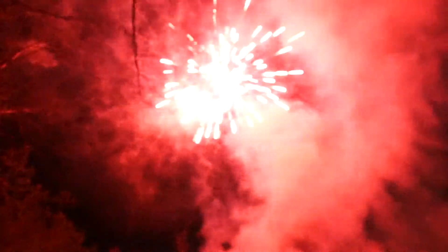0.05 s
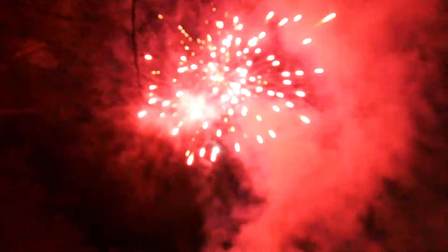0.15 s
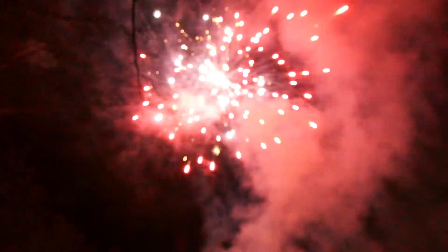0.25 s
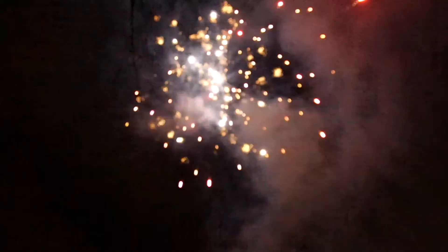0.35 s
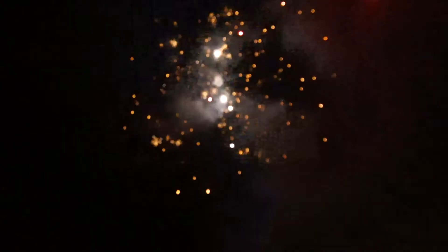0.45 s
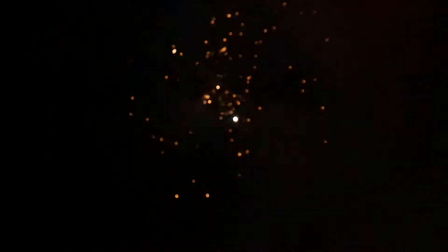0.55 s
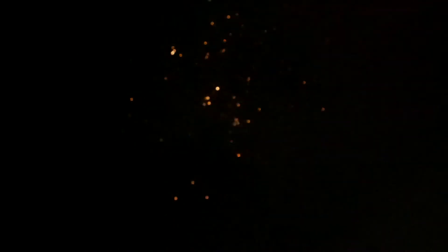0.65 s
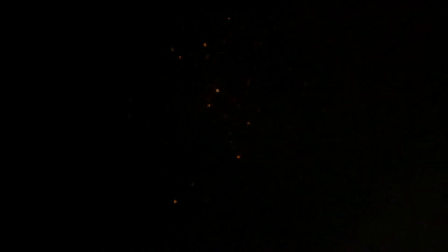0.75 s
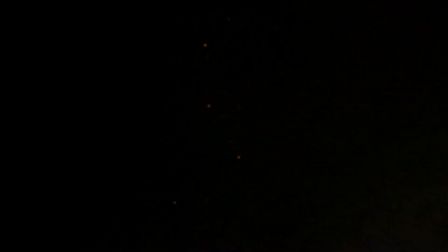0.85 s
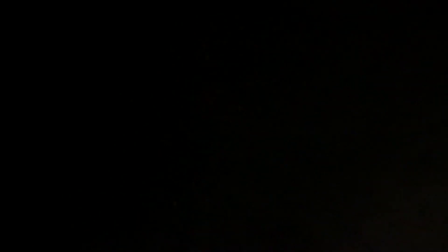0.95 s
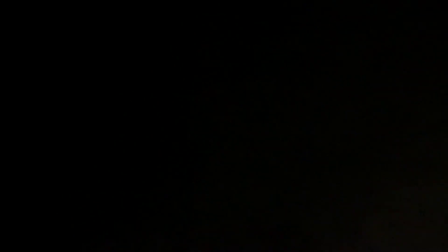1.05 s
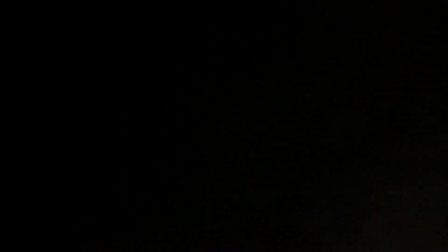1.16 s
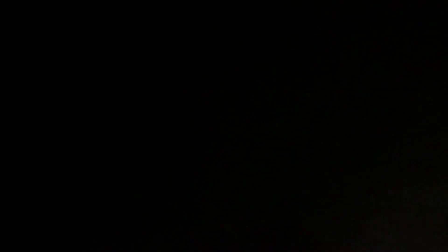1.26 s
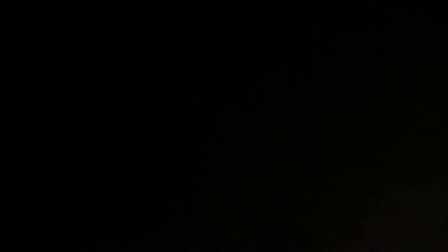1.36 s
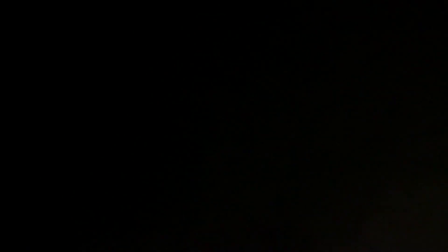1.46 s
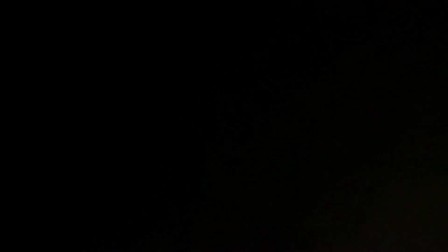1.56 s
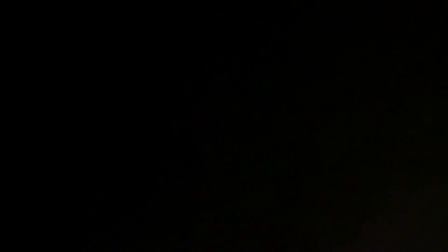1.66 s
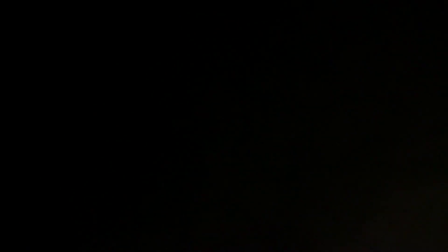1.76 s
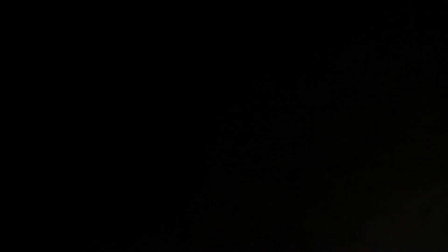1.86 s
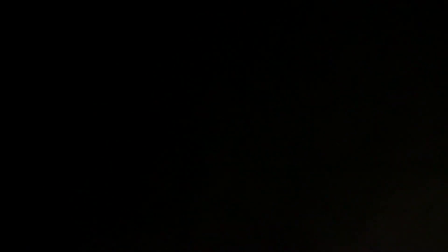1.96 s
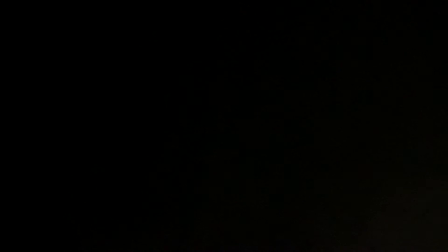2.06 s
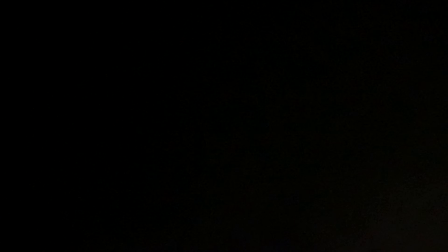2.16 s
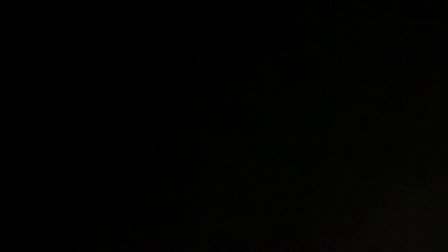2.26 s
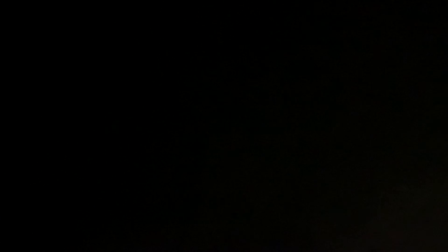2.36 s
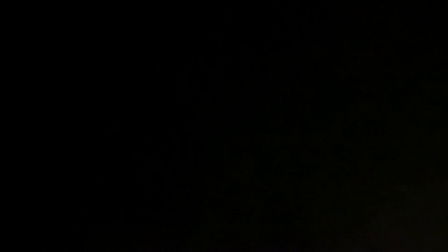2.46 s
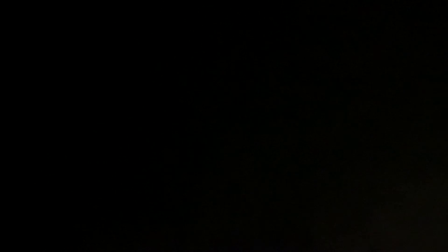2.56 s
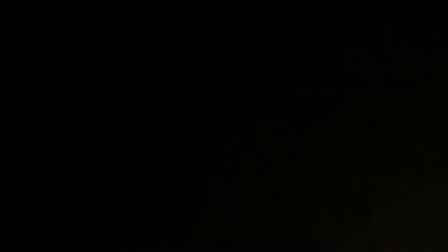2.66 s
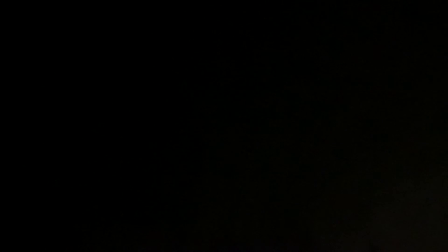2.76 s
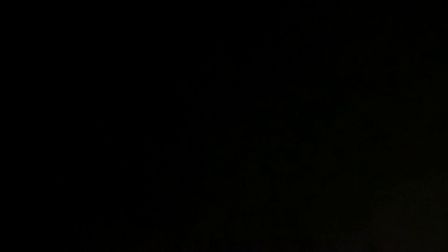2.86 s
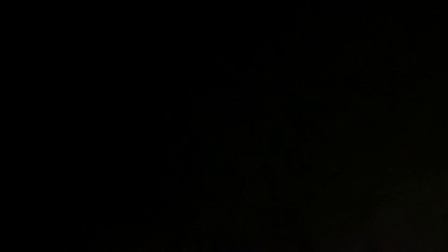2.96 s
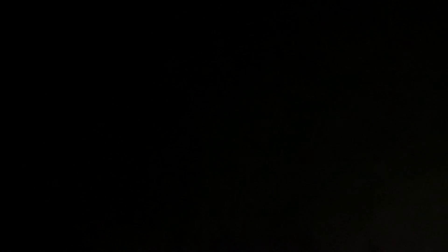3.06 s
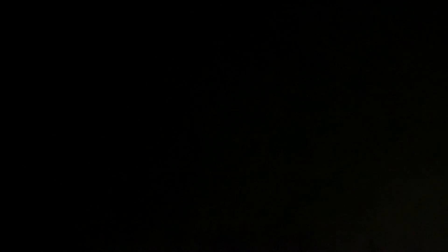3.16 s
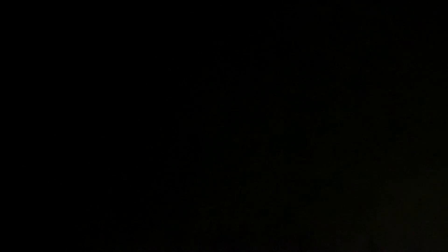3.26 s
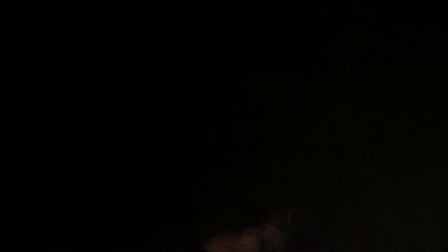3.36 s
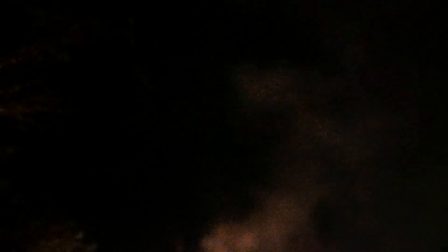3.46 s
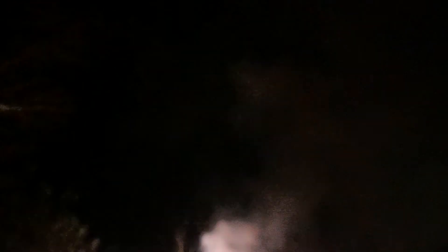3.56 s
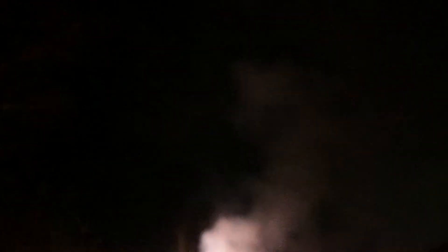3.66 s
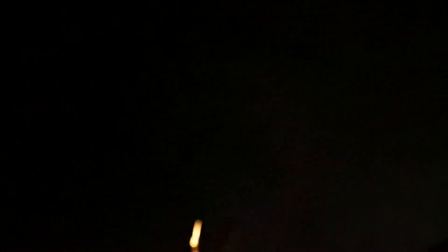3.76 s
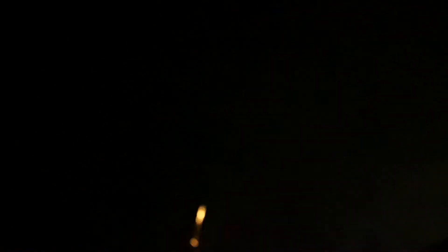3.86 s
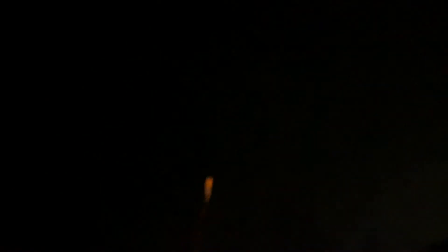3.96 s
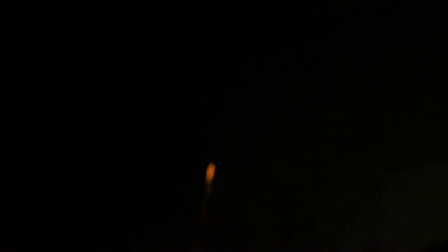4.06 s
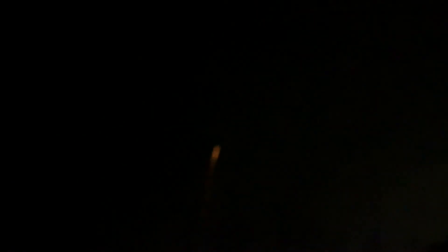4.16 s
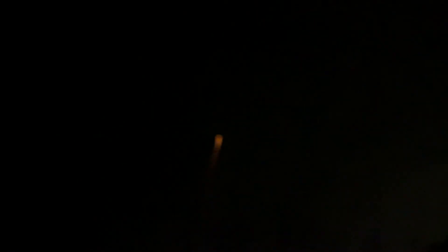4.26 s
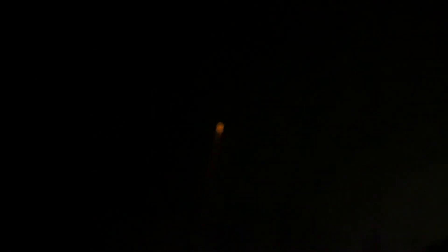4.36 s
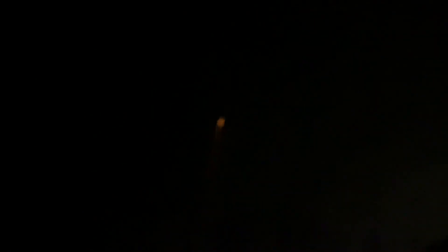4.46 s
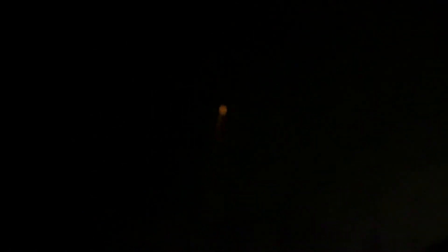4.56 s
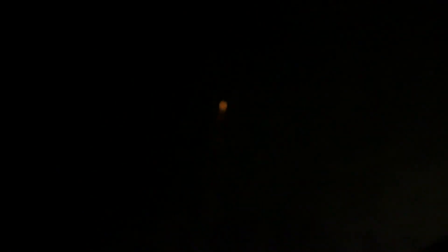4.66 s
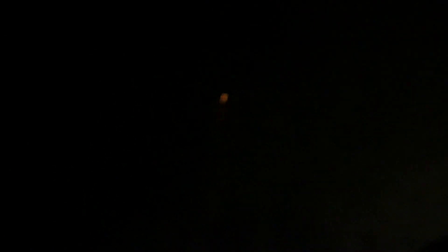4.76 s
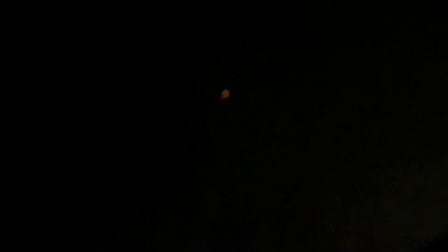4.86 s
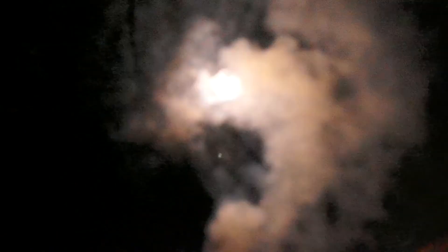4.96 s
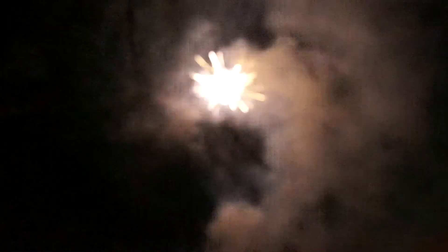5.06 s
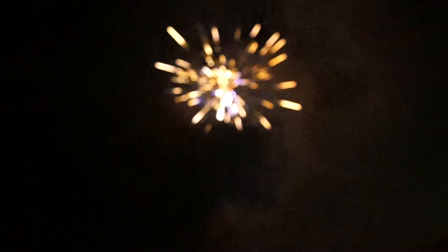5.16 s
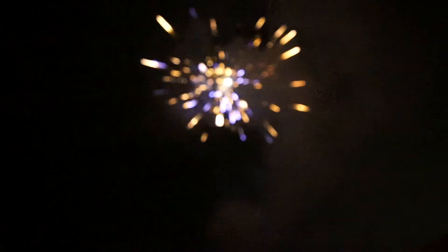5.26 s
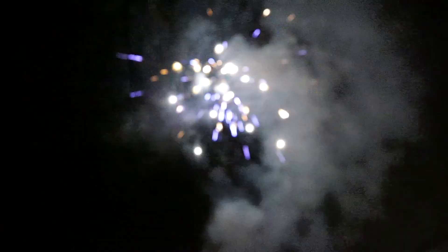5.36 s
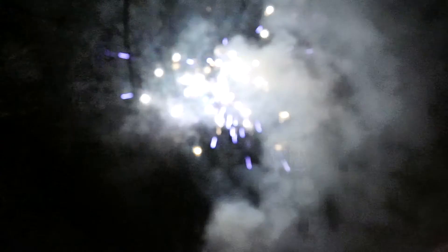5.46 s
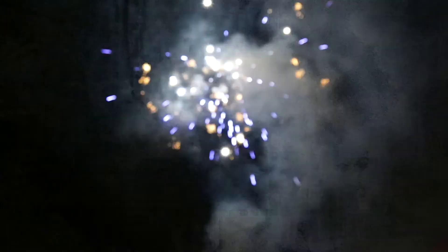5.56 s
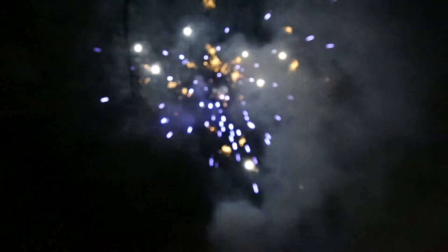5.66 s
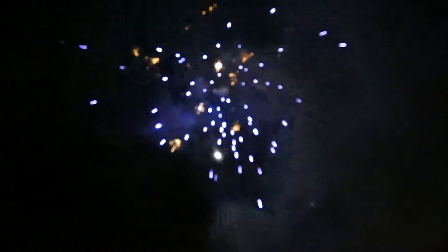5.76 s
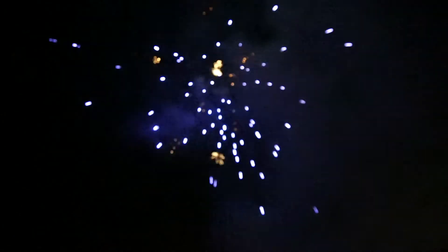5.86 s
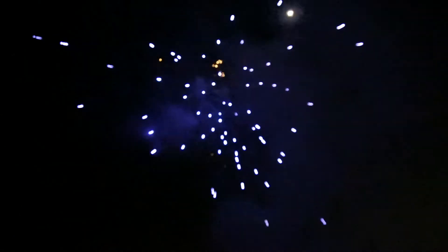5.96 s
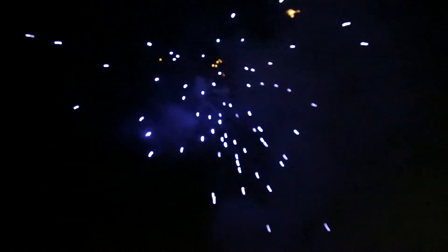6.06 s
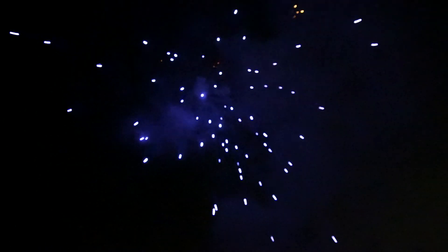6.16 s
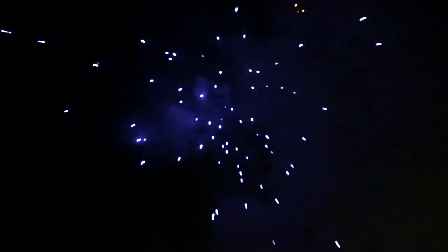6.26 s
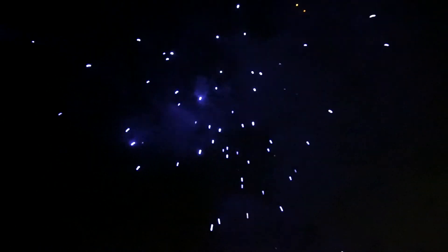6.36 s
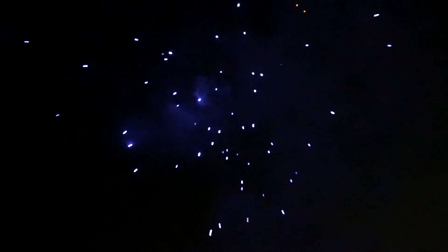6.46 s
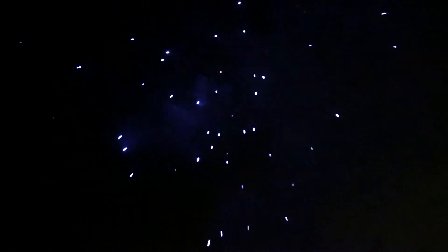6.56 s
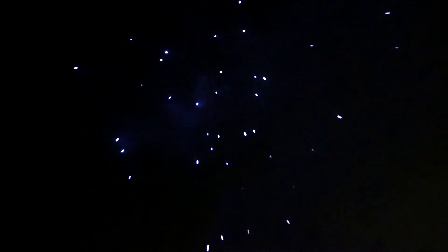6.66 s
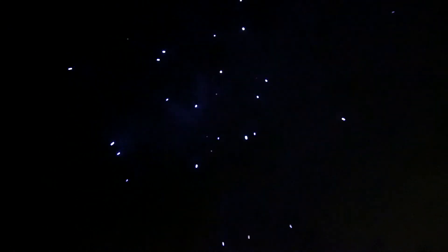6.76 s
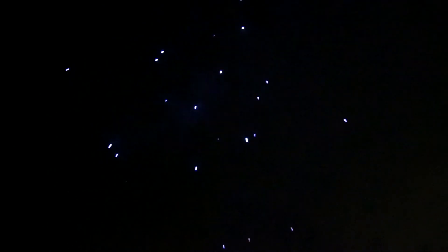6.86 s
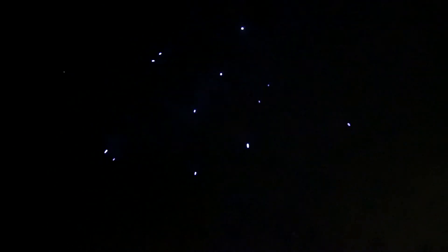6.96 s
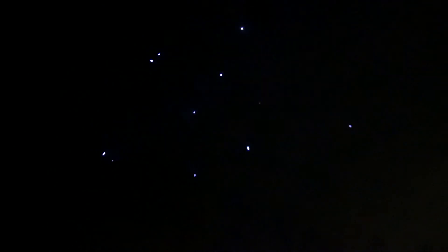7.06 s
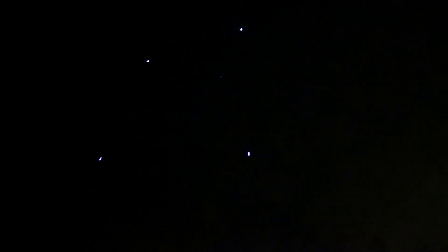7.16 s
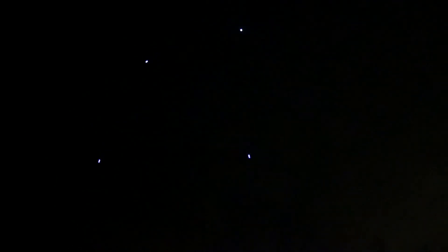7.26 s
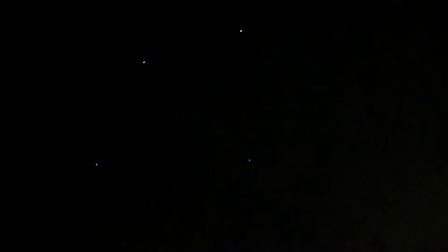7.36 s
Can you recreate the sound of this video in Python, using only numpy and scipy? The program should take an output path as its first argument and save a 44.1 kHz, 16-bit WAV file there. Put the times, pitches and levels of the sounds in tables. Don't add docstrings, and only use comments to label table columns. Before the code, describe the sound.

Outdoors at night near trees, a firework burst is already roaring, then its stars snap in a dense crackle and the echo rolls away. Faint cloth rustles and clicks sit close to the microphone. A fuse hisses briefly, a launch charge bangs and echoes, then a second shell blasts and crackles before fading into quiet handling noise. A small camera's stereo sound compresses the loudest peaks.

```python
import sys
import numpy as np
from scipy import signal
from scipy.io import wavfile

SR = 44100
rng = np.random.default_rng(int(sys.argv[2]) if len(sys.argv) > 2 else 0)


def volts_from_decibels(level):
    exponent = np.asarray(level, float) / 20
    return 10 ** exponent


def transcribe(u):
    v = np.clip(np.atleast_2d(u).T, -1, 1)
    q = np.round(v * 32767).astype(np.int16)
    wavfile.write(sys.argv[1], SR, q)


N = 326781
FRAME, HOP = 1024, 512

# f/Hz, side-mid/dB
PORT_WIDTH = [(60, -7.5), (110, -7), (190, -21), (340, -19), (610, -10.5), (1100, -5.5), (1960, -3.5),
              (3510, -3), (6280, 0), (11200, 2.5)]
# f/Hz, L-R/dB
PORT_LEAN = [(60, -4), (110, -0.5), (190, -1), (340, 0.0), (610, 0.5), (1100, 0.5), (1960, 1.5),
             (3510, 1.0), (6280, 2), (11200, 1)]
# t/s, dip/dB
DUCKS = [
    (0.51, -4),
    (.63, -1),
    (.736, -0.5),
    (5.403, -4),
    (5.699, -2.5),
    (5.865, 0.5),
    (5.975, -0.5),
]

# from/s, to/s, start level >5 kHz/dB, end level/dB
RUSTLE = [
    (1.104, 2.3, -82.5, -75.5),
    (2.44, 2.7, -67.5, -75),
    (2.784, 2.95, -67, -68),
    (3.72, 4.424, -61, -61.5),
    (4.546, 4.874, -60, -58),
    (6.221, 6.447, -75, -73.5),
    (6.56, 7.247, -72, -79.5),
]
# f/Hz, density/dB per Hz
RUSTLE_TONE = [(1000, -25), (2500, 4.5), (5000, -0.5), (8000, -4), (11500, -10.5)]
# t/s, level/dB, f/Hz, t60/s, L-R/dB
TICKS = [(1.3, -50, 5200, .015, 1), (2.44, -53, 5300, .03, 0), (4.288, -44, 9800, 0.012, 1),
         (4.518, -26, 1970, 0.014, 4), (4.517, -30, 3300, 0.015, 0), (4.79, -39, 5070, 0.099, -12),
         (4.789, -40, 2720, 0.044, -1), (4.789, -40, 10400, 0.026, -2.5), (4.872, -32.5, 3590, 0.073, -15),
         (4.872, -40, 7350, 0.079, -7), (4.944, -36.5, 8550, .041, -3), (2.76, -58.5, 9100, .05, 1)]
# t/s, level/dB, f/Hz, t60/s, L-R/dB
SCRAPES = [(1.473, -30, 2900, .007, 2), (6.895, -52, 6000, .015, 2), (1.774, -55, 5830, 0.025, 6),
           (2.004, -45, 4830, 0.092, 7), (2.14, -54, 4073, 0.014, 0), (2.245, -34, 700, 0.017, 2),
           (2.372, -53, 6000, .02, 2), (2.385, -44, 2800, 0.017, 17), (2.427, -50, 6500, .14, -5),
           (2.66, -54, 3900, 0.014, 2), (3.009, -38, 7000, .016, 1.5), (3.333, -28, 7500, .008, 1),
           (4.05, -42, 7000, 0.035, 0), (4.155, -41, 7000, 0.059, -3), (4.414, -41, 5940, 0.062, 2.5),
           (4.546, -35, 8300, 0.017, 14), (4.632, -41, 7000, .015, 15), (4.646, -40, 6000, 0.11, 18),
           (6.124, -35, 6570, 0.075, -3), (6.14, -42, 8000, 0.023, 0), (6.557, -55, 7000, 0.21, -17),
           (3.91, -38, 7000, .025, 0), (7.02, -52, 4500, 0.025, 0.5), (7.36, -46, 4200, 0.017, -7)]

# from/s, to/s, start level 1-2.5 kHz/dB
FUSE = [
    (3.018, 3.447, -41),
    (4.939, 5.1, -39),
    (7.334, 7.41, -45),
]
# f/Hz, density/dB per Hz
FUSE_TONE = [(530, -31), (900, -11), (1090, -8.5), (1600, -2.5), (2320, -7.5), (8260, -31), (11000, -29),
             (11500, -60), (15000, -82), (22000, -120)]
# f/Hz, width/Hz, level/dB
FUSE_TUBE = [(1695, 230, 2), (2090, 160, -2), (3420, 1160, -15), (4200, 590, -20.5), (7000, 2900, -24)]

# f/Hz, density/dB per Hz
YOUNG_ECHO_TONE = [(35, -86), (60, -44), (184, -22), (256, -10), (312, -7), (416, -3.5), (674, -5),
                   (1740, -7), (1850, -8.5), (3510, -11.5), (9230, -24), (10800, -25), (11500, -57),
                   (15000, -85), (22000, -120)]
# f/Hz, loss/dB per s of flight
AIR_LOSS = [(60, 8.5), (200, -2), (500, 0.5), (1000, 1.5), (2000, 5), (3000, 8.5), (4500, 17), (7000, 28.5),
            (11500, 62)]
# f/Hz, width/Hz, gain/dB
GROUND = [(390, 70, 2.5), (582, 187, 0), (827, 164, 4.5), (1440, 120, 2)]
# low f/Hz, high f/Hz
ECHO_BAND_HZ = (300, 1200)
# from/s, to/s
LAUNCH_SPAN_S = (3.44, 5.09)
# t/s, level/dB, source length/s, first fall/dB per s, flight gained/s per s
CARPETS = [
    (-.1, -19.5, 0.43, 107, 2.7),
    (0.446, -28, 0.25, 13.5, 2.12),
    (3.448, -25.5, 0.015, 299, .5),
    (3.475, -20.5, 0.085, 29, 1.58),
    (5.094, -26, 0.097, 289, .5),
    (5.14, -19.5, .33, 112, 3.3),
    (5.63, -30.5, 0.3, 13.5, 1.98),
]

# t/s, level >3 kHz/dB, hold/s, fall/dB per s
SWARM = [
    (.34, -17.5, 0.21, 95),
    (0.454, -16.5, .05, 85.5),
    (5.465, -17.5, 0.24, 56),
]
# from/s, to/s, rate/stars per s
THICK = [
    (.36, .51, 60),
    (5.5, 5.7, 130),
]
# t/s, peak/dB, L-R/dB
STAR_POPS = [(.3812, -8.8, 0), (.3966, -7.6, 0), (.4033, -6.9, 2), (.4315, -7.6, 1), (.4444, -9.7, -2),
             (.4767, -8.2, -1), (.4845, -7.9, 1), (.4991, -8.7, 0), (.511, -8.6, 3), (.5359, -10.8, 3),
             (.5628, -11.7, 4), (.5657, -11.9, 3), (.5895, -12.1, 4), (.611, -5.4, 1), (.6168, -9.2, 0),
             (.6206, -14.2, 5), (.6282, -11.8, 1), (.6547, -17.5, -2), (.7253, -6.1, 2), (.7354, -14.3, 8),
             (5.4028, -9.9, 4), (5.4732, -11.1, -1), (5.4874, -6.8, 0), (5.4935, -8.4, 1),
             (5.5113, -7.2, 1), (5.5762, -7.6, 1), (5.5994, -8, 2), (5.617, -7.3, 3), (5.6436, -7.4, -1),
             (5.6652, -7.3, 2), (5.7234, -12.3, 1), (5.7346, -9.2, 1), (5.7442, -9.6, -3),
             (5.7477, -9.7, -2), (5.7553, -10.7, 2), (5.7741, -8.3, 5), (5.7784, -5.6, 0),
             (5.7885, -9.3, 0), (5.8007, -13.1, 6), (5.8098, -12.7, 8), (5.8239, -13, 4), (5.8488, -9.5, 1),
             (5.8562, -12, 2), (5.8621, -10.2, 2), (5.9075, -17.4, 2), (5.9508, -11.1, -2),
             (5.9586, -13, 6), (5.9725, -13.1, 0), (6.0072, -16.8, 0),
             (0.325, -10, 6),
    (.347, -13, 1),
    (0.352, -7.5, 6),
    (.362, -5, -7),
    (.387, -39, -4),
    (5.476, -8, 0),
    (5.484, -9, 1),
]

# t/s, peak/dB, L-R/dB, push/ms, front spike/0-1
BLASTS = [(3.4427, -18, 0, 0.38, 0), (3.448, -6.5, 0, 0.56, 0.74), (3.451, -13, 6, 0.46, 0.),
          (3.475, -20, 0, 1, 0), (3.493, -2, -3, 0.44, 0), (5.097, -4, -1, 0.4, 0.86),
          (5.101, -14, 6, 0.5, 0.), (5.1059, -10.5, 1, 0.82, 1), (5.143, -4, -3, 0.38, 0.6),
          (5.1444, -37, -2, 0.24, 0.3), (5.1467, -13, -6, 0.4, 0.3)]


def spectrum(table, hz):
    f, v = np.transpose(table)
    return np.interp(np.log(np.maximum(hz, 1)), np.log(f), v)


def envelope(spans, fade_s=0.0052, hold_s=0.):
    t, out = np.arange(N) / SR, np.zeros(N)
    for rows in spans:
        s, db = np.transpose(rows)
        gate = np.clip(np.minimum(t - s[0], s[-1] + hold_s - t) / fade_s + 1, 0, 1)
        out = np.maximum(out, volts_from_decibels(np.interp(t, s, db)) * gate)
    return out


def grit(scatter_db):
    x = rng.standard_normal((2, N)) * volts_from_decibels(scatter_db * np.minimum(rng.exponential(size=N), 5))
    return x / x.std()


def colour(mid_side, db, lo_hz, hi_hz, wide_db=0.):
    hz, s, z = signal.stft(mid_side, SR, nperseg=FRAME, noverlap=HOP)
    gain = volts_from_decibels(db(hz[:, None], s[None, :])) + 0 * s
    band = (hz > lo_hz) & (hz < hi_hz)
    gain = gain / np.sqrt(np.sum(gain[band] ** 2, axis=0) / len(hz))
    side = z[1] * volts_from_decibels(spectrum(PORT_WIDTH, hz) + wide_db)[:, None]
    lean = volts_from_decibels(spectrum(PORT_LEAN, hz) / 2)[:, None]
    pair = np.array([(z[0] + side) * lean, (z[0] - side) / lean]) * gain
    return signal.istft(pair, SR, nperseg=FRAME, noverlap=HOP)[1][:, :N]


def add(out, s, shape, db, pan_db):
    i = int(s * SR)
    out[:, i:i + shape.shape[-1]] += shape[..., :N - i] * volts_from_decibels(db + np.array([[pan_db], [-pan_db]]) / 2)


def ducking():
    t, recover_s = np.arange(N) / SR, 0.14
    return volts_from_decibels(sum(db * (t > s) * np.exp(-np.maximum(t - s, 0) / recover_s) for s, db in DUCKS))


def rustle():
    wander_db, wander_s = 1.5, 0.12
    steps = rng.standard_normal(100)
    wander = volts_from_decibels(wander_db * np.interp(np.arange(N) / SR / wander_s, np.arange(len(steps)), steps))
    cloth = colour(grit(3.1), lambda hz, s: spectrum(RUSTLE_TONE, hz), 4940, 11000, wide_db=2.0)
    spans = [[(a, a_db), (b, b_db)] for a, b, a_db, b_db in RUSTLE]
    return wander * cloth * envelope(spans, 0.12, 0.076)


def ticks():
    tick_share, scrape_share = 0.11, 1.05
    out, t = np.zeros((2, N)), np.arange(4096) / SR
    rows = [(*row, tick_share) for row in TICKS] + [(*row, scrape_share) for row in SCRAPES]
    for s, db, hz, t60, pan_db, share in rows:
        mid, side = rng.standard_normal((2, len(t)))
        width_hz = share * hz
        b, a = signal.butter(1, [max(hz - width_hz / 2, 100), hz + width_hz / 2], "band", fs=SR)
        scratch = (mid + 0.65 * side * np.array([[1], [-1]])) * 1000 ** (-t / t60)
        ring = signal.lfilter(b, a, signal.lfilter(b, a, scratch))
        add(out, s, ring / np.abs(ring).max(), db, pan_db)
    return out


def fuse():
    rise_db_per_s = 6
    spits = rng.standard_normal(N // HOP + 3)
    spit_s = np.arange(len(spits)) * HOP / SR

    def tone(hz, s):
        rings = sum(volts_from_decibels(db) / (1 + (2 * (hz - f) / width_hz) ** 4) for f, width_hz, db in FUSE_TUBE)
        spit_db = 3.1 * np.interp(s, spit_s, spits) * np.clip(hz / 3000 - 0.7, 0.2, 1)
        return 20 * np.log10(volts_from_decibels(spectrum(FUSE_TONE, hz) - 0.5) + rings) + spit_db

    spans = [[(a, db), (b, db + rise_db_per_s * (b - a))] for a, b, db in FUSE]
    return colour(grit(4.4), tone, 960, 2550, wide_db=2.5) * envelope(spans, 0.0069, 0.004)


def carpets():
    swell_db, swell_s = 9.5, 0.019
    slap_db, slap_db_per_s = -4.5, 704
    spread_s, near_flight_s, age_while_lasting = 1.27, 0.068, 0.19
    late_ageing_s = 1.78
    fuse_echo_db, fuse_flight_s = -3.5, 0.59
    t = np.arange(N) / SR
    power, flown = np.full(N, 1e-12), np.zeros(N)
    for s, db, lasts_s, fall, pace in CARPETS:
        age = np.maximum(t - s, 0)
        after = np.maximum(age - lasts_s, 0)
        swell = volts_from_decibels(-swell_db * np.exp(-age / swell_s)) ** 2 + volts_from_decibels(slap_db - slap_db_per_s * age) ** 2
        p = (t > s) * swell * volts_from_decibels(db - fall * spread_s * np.log1p(after / spread_s)) ** 2
        ageing = late_ageing_s * np.log1p(after / late_ageing_s)
        ageing = ageing + age_while_lasting * np.minimum(age, lasts_s)
        power = power + p
        flown = flown + p * (near_flight_s + pace * ageing)
    spans = [[(a, db + fuse_echo_db), (b, db + fuse_echo_db)] for a, b, db in FUSE]
    p = envelope(spans, 0.065) ** 2
    return np.sqrt(power + p), (flown + p * fuse_flight_s) / (power + p)


def echoes():
    launch_ground, launch_bass_db, launch_bass_hz = 1, -2, 550
    gain, flight_s = carpets()
    young = np.clip(1 - flight_s / 0.52, 0, 1)
    returns = np.sqrt(young) * grit(4.1) + np.sqrt(1 - young) * rng.standard_normal((2, N))

    def tone(hz, s):
        flown_s = np.interp(s, np.arange(N) / SR, flight_s)
        low = (s > LAUNCH_SPAN_S[0]) & (s < LAUNCH_SPAN_S[1])
        ground_db = sum(db * np.exp(-((hz - f) / width_hz) ** 2) for f, width_hz, db in GROUND)
        ground_db = ground_db * np.tanh(flown_s / 0.81 + launch_ground * low)
        bass_db = launch_bass_db * low / (1 + (hz / launch_bass_hz) ** 4)
        return spectrum(YOUNG_ECHO_TONE, hz) - spectrum(AIR_LOSS, hz) * flown_s + ground_db + bass_db

    return colour(returns, tone, *ECHO_BAND_HZ) * gain


def shock(ms, spike, bend, swings):
    t = np.arange(256) / SR - 1.5e-4
    u = np.maximum(t, 0) * 1000 / ms
    swing = np.sin(np.pi * u ** bend) * np.exp(-(u / swings) ** 2)
    return swing / swing.max() - spike * np.exp(-((t + 4e-5) / 5e-5) ** 2)


def swarm(ms, spike, bend):
    rate_per_s, scatter_db, pops_db = 600, 3.0, -7
    echo_db, echo_hz = -12, 8000
    rise_s, rise_db, fade_s = 0.045, 12, 0.6
    wave = shock(ms, spike, bend, 1.9)
    sizes = volts_from_decibels(scatter_db * np.minimum(rng.exponential(size=(2, N)), 3))
    pops = (rng.random((2, N)) < rate_per_s / SR) * sizes
    lowpass = signal.butter(1, echo_hz, fs=SR, output="sos")
    blur = signal.sosfilt(lowpass, rng.standard_normal((2, N)))
    treble = signal.butter(2, [3000, 10000], "band", fs=SR, output="sos")
    out = 0
    for shocks, db in ((pops, pops_db), (blur, echo_db)):
        aims = shocks[0] + 0.49 * shocks[1] * np.array([[1], [-1]])
        heard = signal.oaconvolve(aims, wave[None], axes=1)[:, :N]
        out = out + heard / signal.sosfilt(treble, heard[0]).std() * volts_from_decibels(db)
    spans = [[(s, db - rise_db), (s + rise_s, db), (s + hold_s, db),
              (s + hold_s + fade_s, db - fall * fade_s)] for s, db, hold_s, fall in SWARM]
    return out * ducking() * envelope(spans, 0.026)


def thick_stars():
    level_db, scatter_db, pan_db = -12.5, 1.6, 1.5
    rows = []
    for a, b, rate in THICK:
        for k, (late, size, aim) in enumerate(rng.standard_normal((int((b - a) * rate), 3))):
            s = a + (k + 0.5 + late / 3) / rate
            rows.append((s, level_db + scatter_db * size, pan_db + 2 * aim))
    return rows


def crackle():
    pop_ms, spike, bend, lift_db = 0.2, 0.6, 0.6, 1.5
    out = swarm(pop_ms, spike, bend)
    for s, db, pan_db in STAR_POPS + thick_stars():
        size, sharp = rng.random(2)
        wave = shock(pop_ms * (0.52 + 0.52 * size), spike * (0.51 + sharp), bend, 3.65)
        add(out, s - np.argmax(wave) / SR, wave, db + lift_db, pan_db)
    no_bass = signal.butter(2, 420, "high", fs=SR, output="sos")
    return signal.sosfilt(no_bass, out)


def blasts():
    out = np.zeros((2, N))
    for s, db, pan_db, ms, spike in BLASTS:
        wave = shock(ms, spike, 0.8, 2.75)
        add(out, s - np.argmax(wave) / SR, wave, db, pan_db)
    return out


def scene():
    return rustle() + ticks() + fuse() + echoes() * ducking() + crackle() + blasts()


def roll_off(x):
    return signal.sosfilt(signal.butter(12, 11830, fs=SR, output="sos"), x)


def record(dry):
    x = signal.sosfilt(signal.butter(2, 120, "high", fs=SR, output="sos"), dry)
    pump = signal.sosfilt(signal.butter(1, [12, 70], "band", fs=SR, output="sos"), x ** 2)
    x = np.tanh(1.05 * x) / 1.11 + 0.021 * pump
    x = signal.sosfiltfilt(signal.ellip(8, 0.2, 60, 11100, fs=SR, output="sos"), x)
    return roll_off(x)


dry = scene()
out = record(dry)
transcribe(out)
```